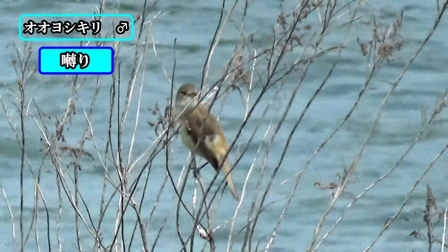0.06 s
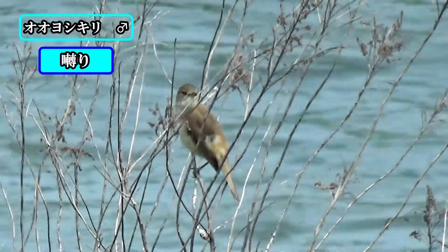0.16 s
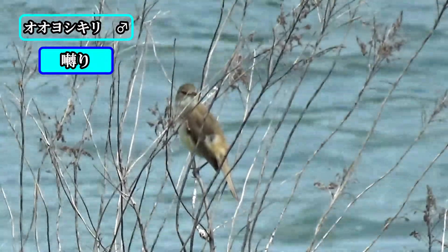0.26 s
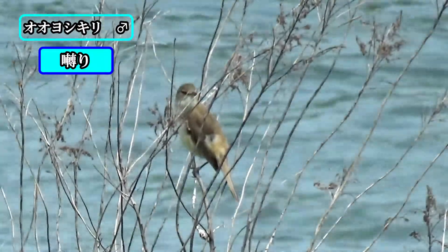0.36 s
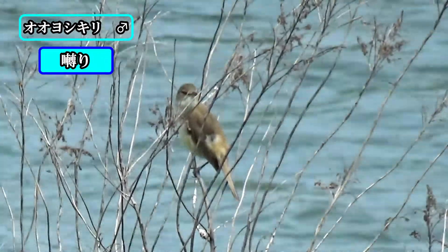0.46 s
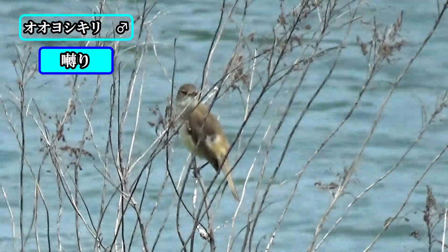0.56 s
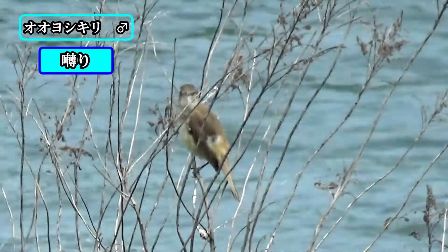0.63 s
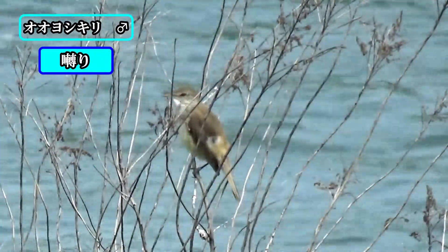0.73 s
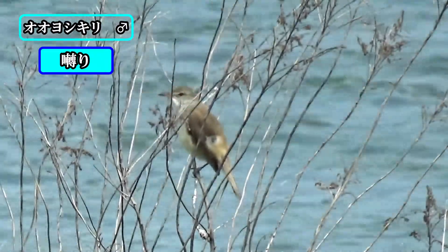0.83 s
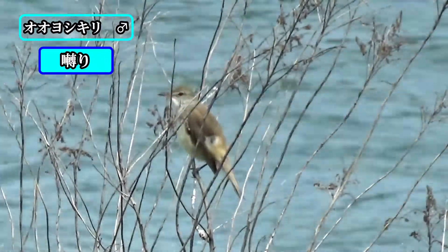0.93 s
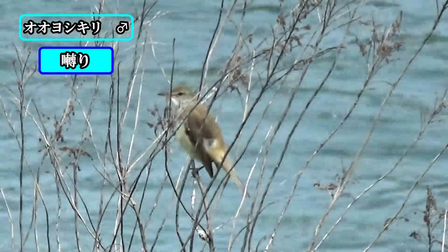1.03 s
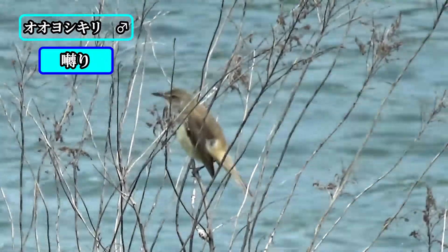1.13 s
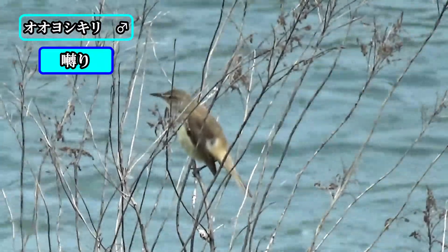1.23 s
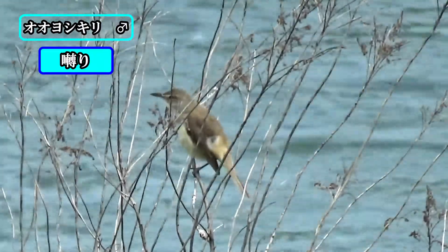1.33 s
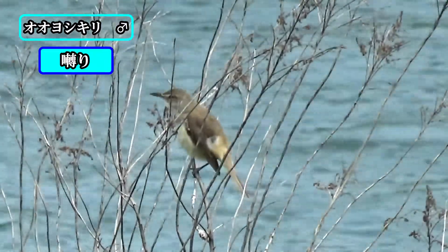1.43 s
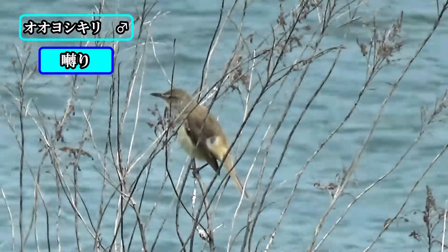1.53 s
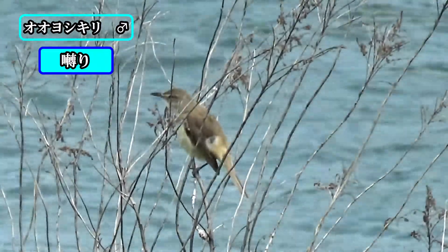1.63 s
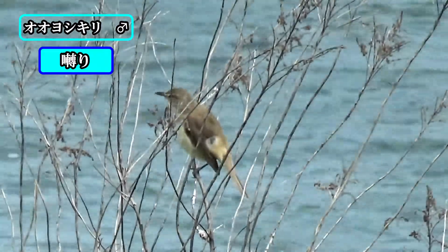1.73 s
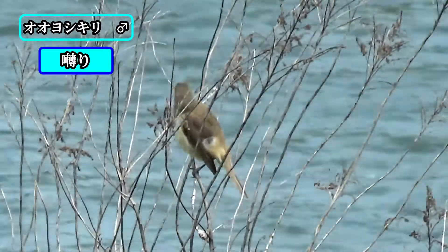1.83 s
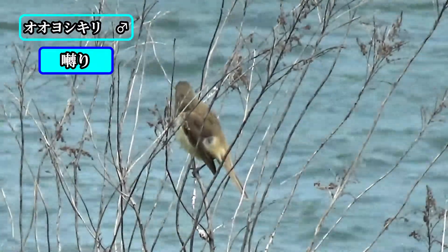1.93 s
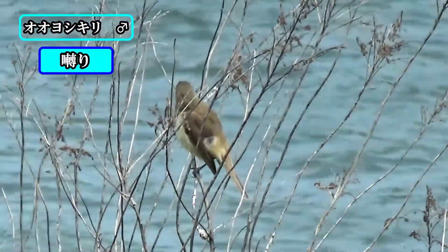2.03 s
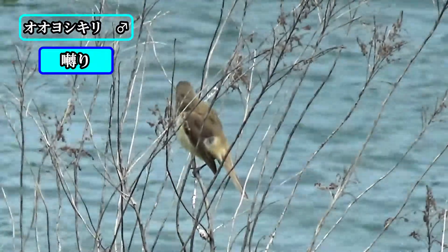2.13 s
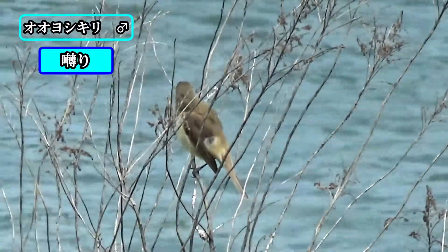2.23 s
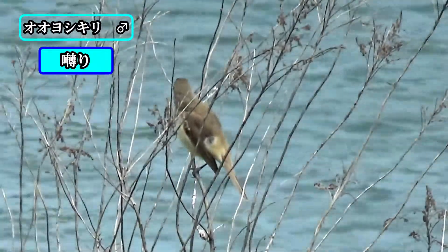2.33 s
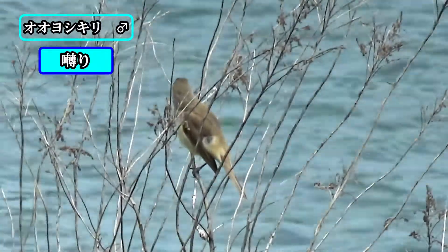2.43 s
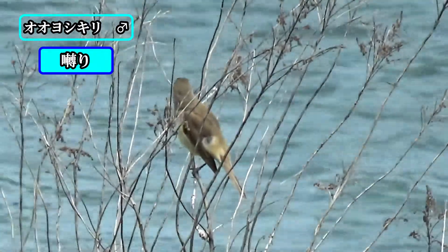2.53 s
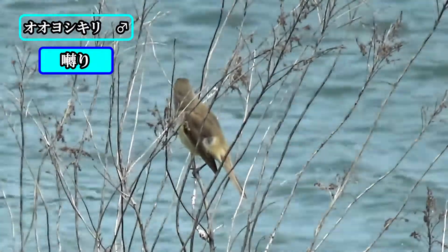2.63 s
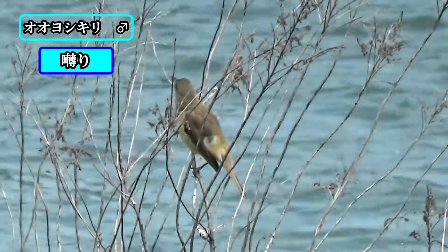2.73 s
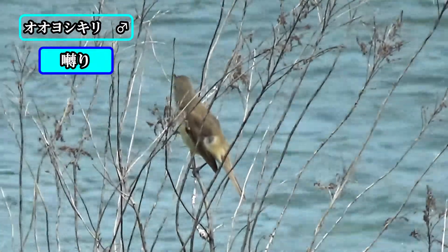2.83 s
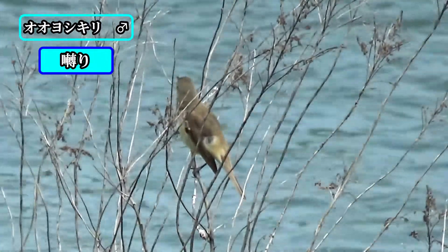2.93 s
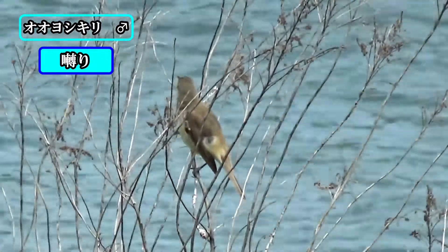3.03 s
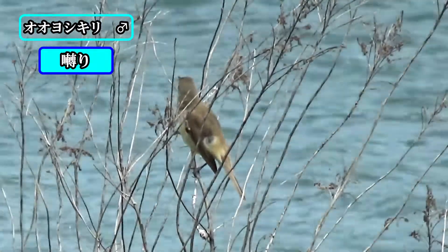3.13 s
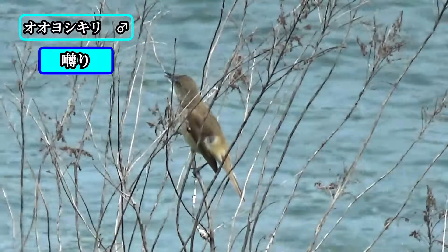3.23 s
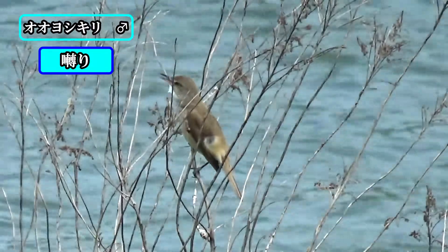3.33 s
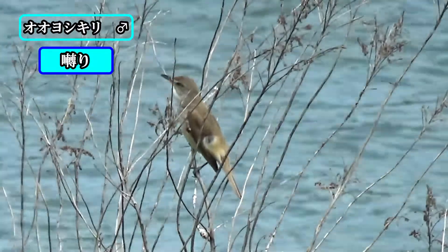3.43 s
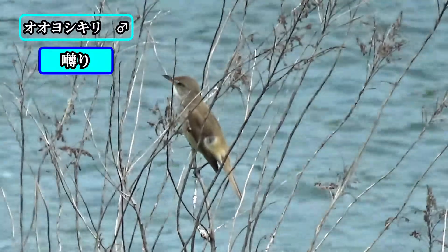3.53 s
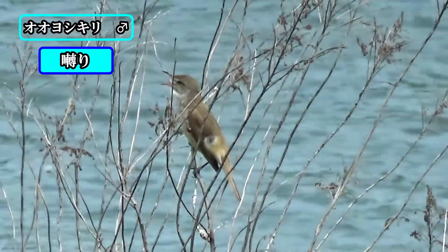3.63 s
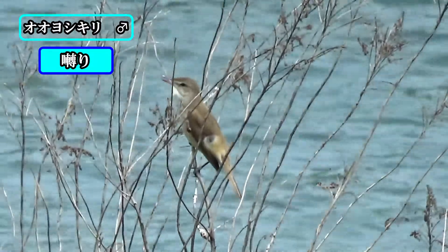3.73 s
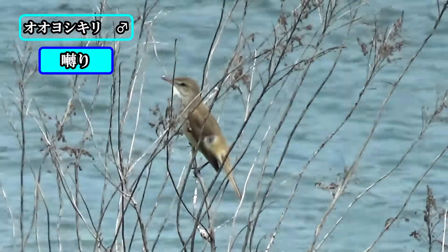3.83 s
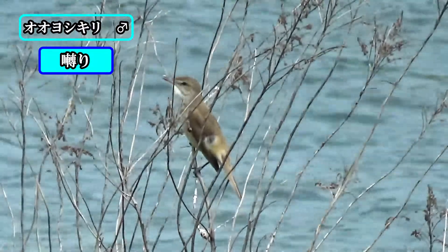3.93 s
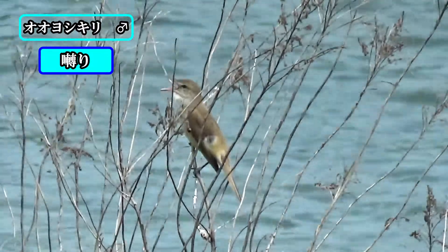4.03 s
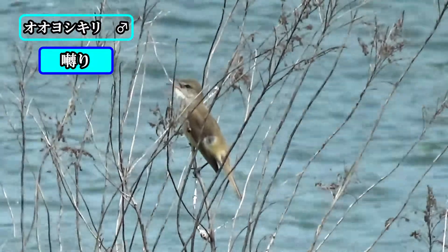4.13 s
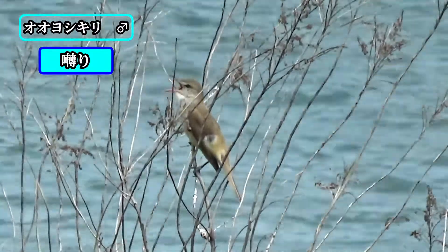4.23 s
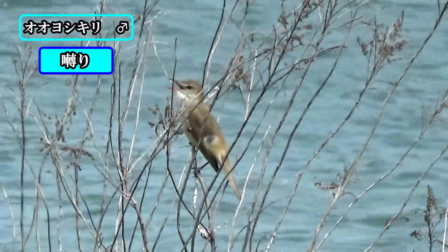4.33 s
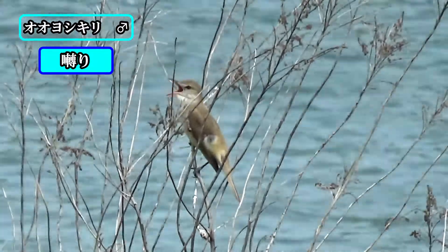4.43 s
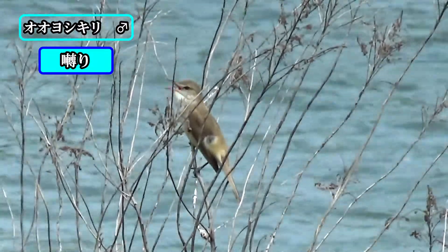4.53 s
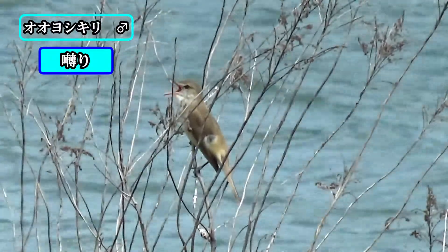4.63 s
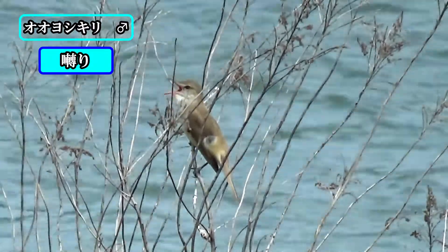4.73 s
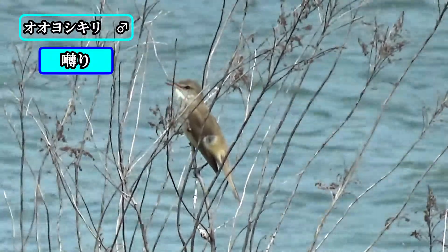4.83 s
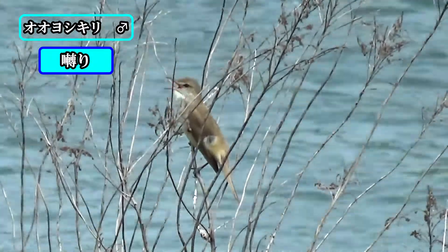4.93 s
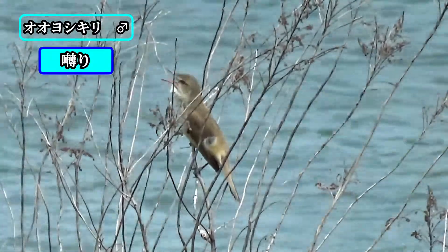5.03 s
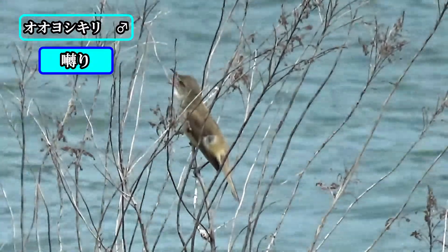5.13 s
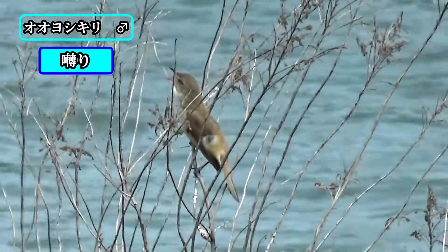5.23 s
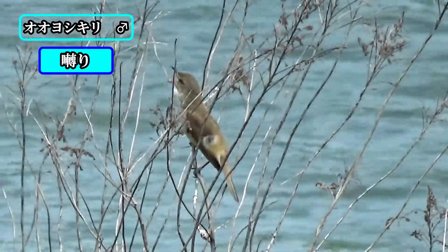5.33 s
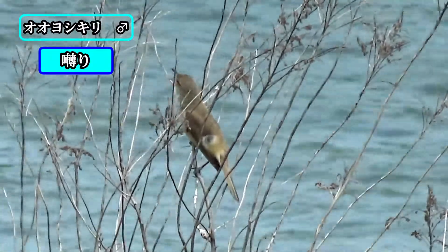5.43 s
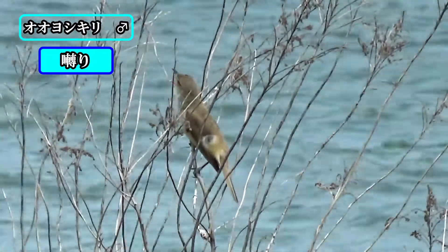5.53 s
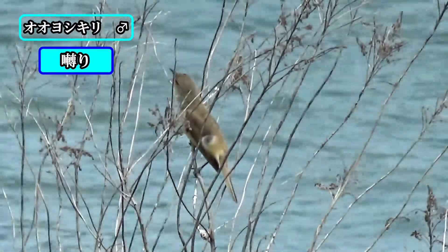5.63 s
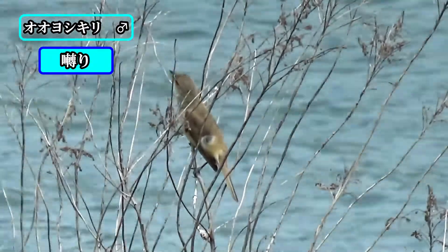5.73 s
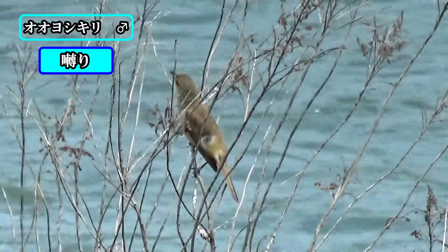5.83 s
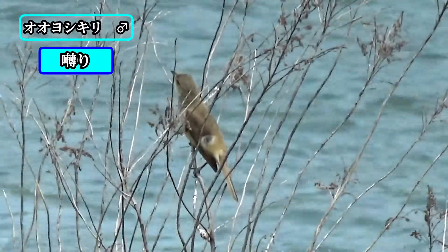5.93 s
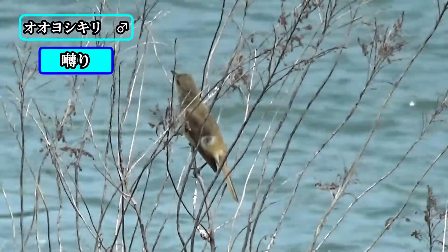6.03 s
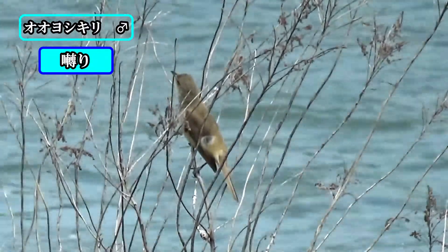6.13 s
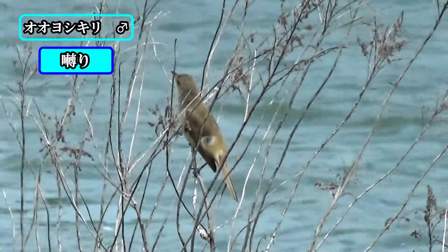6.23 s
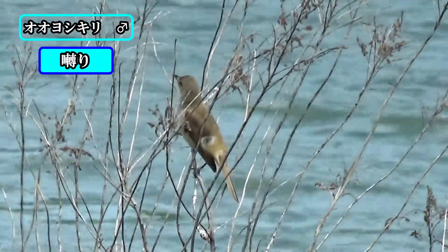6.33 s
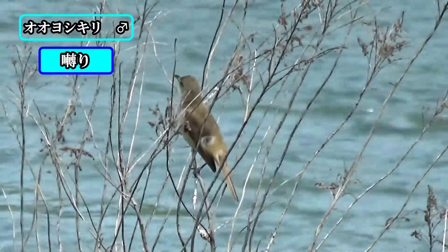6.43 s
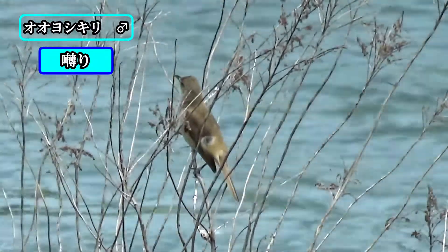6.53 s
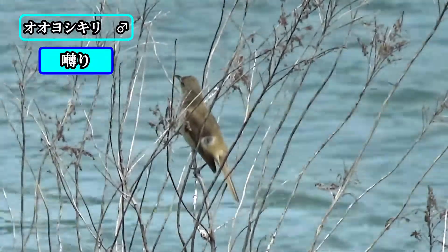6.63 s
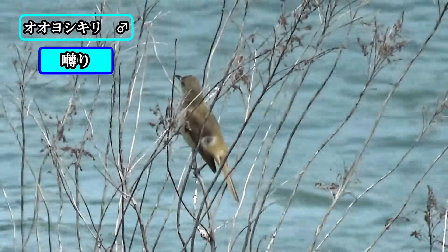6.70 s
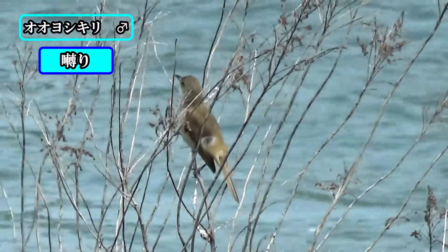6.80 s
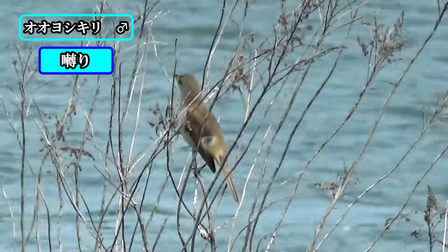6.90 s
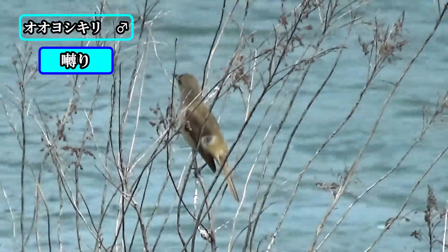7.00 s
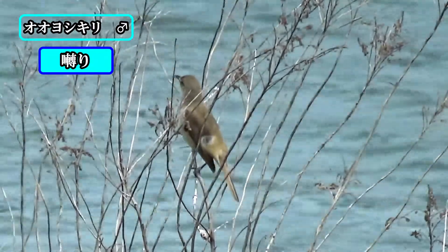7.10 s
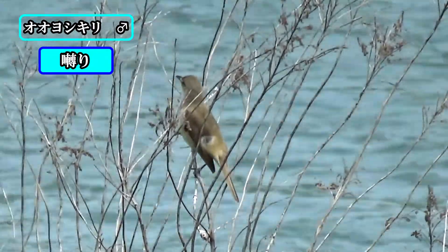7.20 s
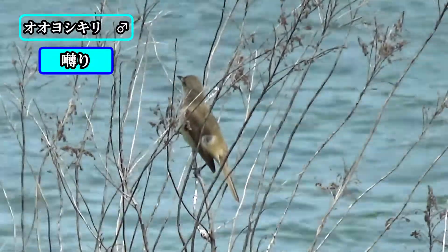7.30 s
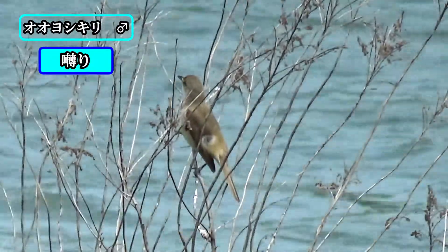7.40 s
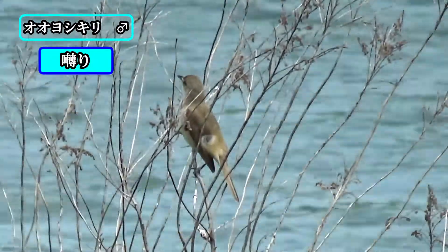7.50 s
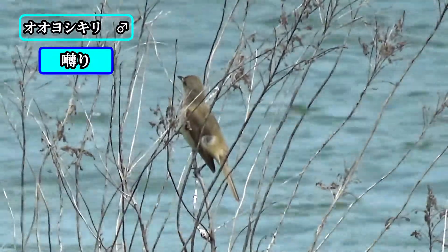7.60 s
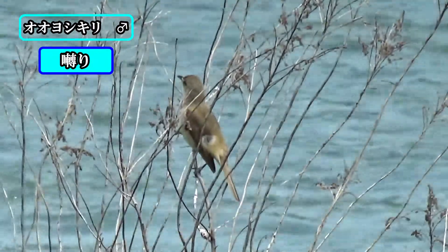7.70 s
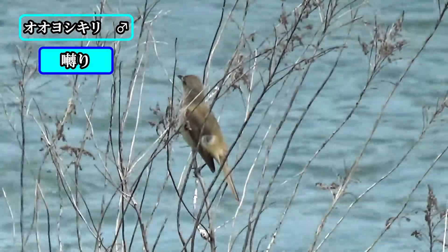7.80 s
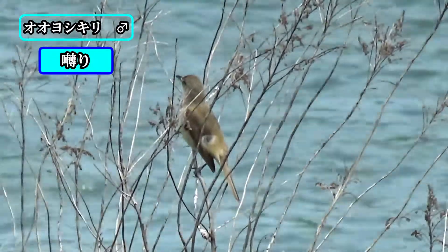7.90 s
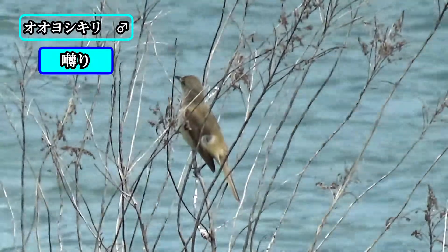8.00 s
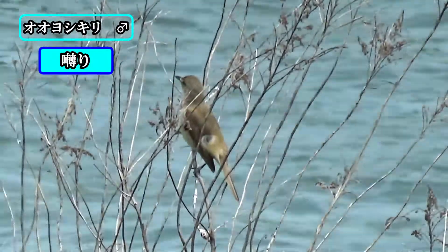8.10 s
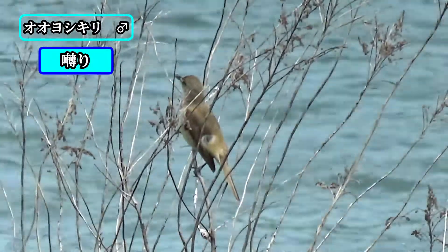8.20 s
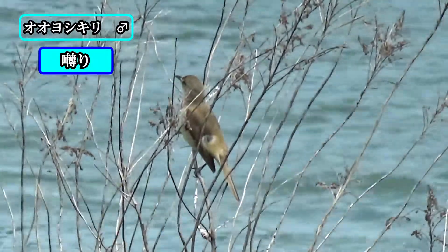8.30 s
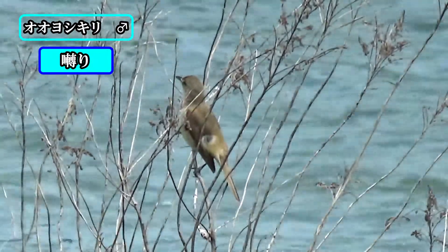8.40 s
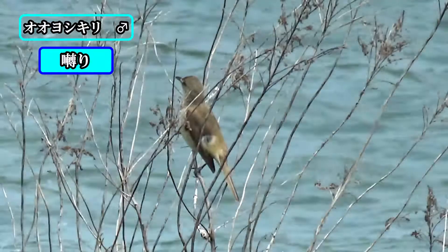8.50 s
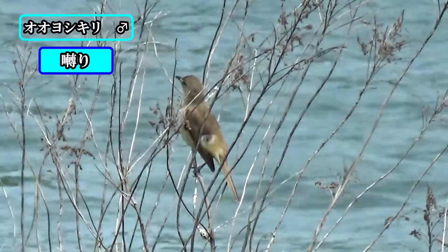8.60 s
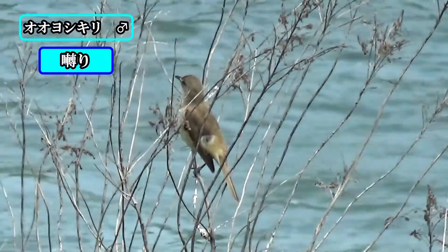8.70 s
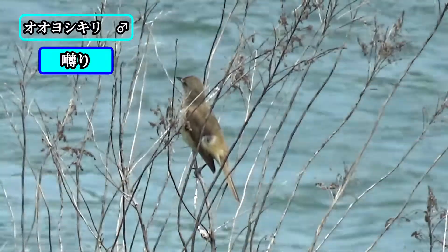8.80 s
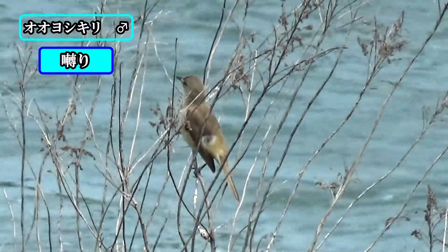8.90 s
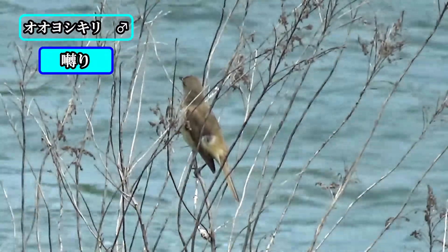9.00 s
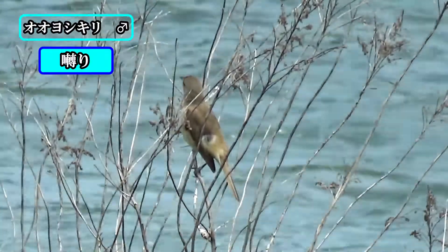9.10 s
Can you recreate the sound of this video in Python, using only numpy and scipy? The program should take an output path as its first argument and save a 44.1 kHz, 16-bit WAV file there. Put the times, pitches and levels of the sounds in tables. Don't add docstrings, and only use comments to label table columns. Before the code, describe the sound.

A reed warbler sings short buzzy chirrs, tick-and-whistle notes and harsh rasps over steady wind hiss in dry reeds, with faint far birds whistling.

```python
import sys
import numpy as np
from scipy import signal
from scipy.fft import rfft, irfft, next_fast_len
from scipy.io import wavfile
from scipy.ndimage import uniform_filter1d

SR = 44100
rng = np.random.default_rng(int(sys.argv[2]) if len(sys.argv) > 2 else 0)


def volts_from_db(level):
    exponent = np.asarray(level, float) / 20
    return 10 ** exponent


def digitize_waveform(pressure):
    field = np.atleast_2d(pressure).T
    bounded = np.clip(field, -1, 1)
    quanta = np.round(bounded * 32767).astype(np.int16)
    wavfile.write(sys.argv[1], SR, quanta)


N = 403515
T = np.arange(N) / SR
FAST = next_fast_len(N)
HZ = np.fft.rfftfreq(FAST, 1 / SR) + 1


def on_log(points, hz):
    p = np.array(points, float)
    return np.interp(np.log(hz + 1), np.log(p[:, 0]), p[:, 1])


def colour(x, points):
    return irfft(rfft(x, FAST) * volts_from_db(on_log(points, HZ)), FAST)[:N]


def noise(points):
    x = colour(rng.standard_normal(N), points)
    return x / x.std()


def ring(x, modes):
    response = sum(volts_from_db(db) / (1 + 1j * (HZ ** 2 - f ** 2) / (HZ * w)) ** 2 for f, w, db in modes)
    return irfft(rfft(x, FAST) * response, FAST)[:N]


def walk(rate_hz):
    k = int(SR / rate_hz)
    steps = np.repeat(rng.standard_normal(N // k + 1), k)
    return 1.3 * uniform_filter1d(uniform_filter1d(steps, k), k)[:N]


def curve(points):
    return np.interp(T, *np.transpose(points))


def play(tables, edge_ms=2.5):
    gate = np.clip(sum((T >= t[0][0]) & (T < t[-1][0]) for t in tables), 0, 1)
    s, *columns = np.transpose(sorted(row for t in tables for row in t))
    gate = uniform_filter1d(1. * gate, int(edge_ms * SR / 1000) + 1)
    return gate, [np.interp(T, s, c) for c in columns]


def spin(hz):
    return np.exp(2j * np.pi * np.cumsum(hz) / SR)


def pulses(hz, scatter_db):
    cycle = np.floor(np.cumsum(hz * (1 + .08 * walk(900))) / SR)
    return np.diff(cycle, prepend=0) * volts_from_db(scatter_db * rng.standard_normal(N)) * np.sqrt(SR / hz)


def stretch(start_s, length_s, shape):
    share, *columns = np.transpose(shape)
    return start_s + length_s * share, share, columns


REEDS_DB = -53
# [f/Hz, level/dB per Hz]
REEDS = [(150, -52), (250, -20.5), (421, -12), (575, -12.5), (684, -7), (903, -7.5), (1280, -1.5),
         (1630, -1), (2990, -4.5), (4300, -6), (4940, -13.5), (6520, -8.5), (8760, -18), (10600, -20),
         (15800, -26.5)]
# [t/s, level/dB]
GUSTS = [(0, -55), (.5, -54), (.9, -60), (1.3, -52), (1.6, -55.5), (2.5, -57), (3.9, -58.5), (4.3, -50),
         (5, -53), (5.85, -58), (6.05, -54), (6.13, -47.5), (6.25, -47.5), (6.4, -56), (6.6, -61.5),
         (7.5, -66), (8.5, -57.5), (9.15, -59)]
# [f/Hz, level/dB per Hz]
RUSTLE = [(900, -28.5), (1400, -10), (2200, -4.5), (2650, -0.5), (3200, -3.5), (4300, -6.5), (4800, -18),
          (5500, -6.5), (7500, -12.5), (9800, -31.5), (13000, -34)]
# [t/s, level/dB]
INSECTS = [(0, -77), (.3, -70), (1.4, -64.5), (1.7, -76), (5.94, -82), (6.02, -63), (6.2, -58), (6.3, -62),
           (6.38, -72), (9.15, -89)]
# [t/s, level/dB]
BUFFETS = [(0, -79.5), (1.2, -84), (4, -83), (4.7, -80.5), (6.5, -84), (8, -82.5), (9.15, -80)]
# [f/Hz, level/dB per Hz]
RUMBLE = [(15, -30), (25, -2.5), (43, 4.5), (64, -11.5), (97, 3), (135, -11.5), (171, -2.5), (249, -11.5),
          (300, -7.5), (390, -6.5), (660, -120)]


def wind():
    steady = volts_from_db(REEDS_DB - 0.5 + .5 * walk(2.95)) * noise(REEDS)
    gusts = volts_from_db(curve(GUSTS) + walk(25)) * noise(RUSTLE)
    insect_band = noise([(4900, -60), (5280, -4), (5450, 0), (5700, -16), (6300, -60)])
    insects = volts_from_db(curve(INSECTS) + 1.5 * walk(30)) * insect_band
    rumble = volts_from_db(curve(BUFFETS) + 4.0 + 2.0 * walk(5)) * noise(RUMBLE)
    return steady + gusts + insects + rumble


def glide(start_s, length_s, first_hz, last_hz, peak_db):
    s, share, (under_db,) = stretch(start_s, length_s, [(0, -2), (0.58, 0), (1, -1.5)])
    return list(zip(s, first_hz + (last_hz - first_hz) * share, peak_db + under_db))


# [start/s, length/s, first f/Hz, last f/Hz, peak level/dB]
NOTES = [(0.079, 0.066, 1980, 1710, -53.5), (0.124, 0.051, 3120, 3030, -49.5), (.14, .03, 2450, 2450, -54),
         (0.191, .016, 3060, 3050, -51), (0.279, 0.048, 3000, 3120, -47.5), (0.343, 0.015, 3090, 3100, -49),
         (0.451, 0.0097, 2250, 1910, -47.5), (0.634, 0.036, 2700, 2700, -55), (1.462, .04, 3400, 3500, -56),
         (1.395, .05, 4400, 5000, -61), (2.692, 0.013, 3890, 2900, -50), (2.752, 0.013, 3390, 3150, -53),
         (2.786, .014, 4200, 3500, -54), (3.248, .02, 3720, 3100, -54), (8.605, .02, 4000, 5600, -58),
         (2.811, 0.014, 1700, 1505, -50), (3.271, 0.013, 1700, 1540, -50), (5.995, 0.073, 3470, 3520, -53),
         (6.4, 0.036, 4200, 4200, -57.5), (7.3, 0.4, 1826, 1830, -62), (7.72, .035, 4360, 4550, -60),
         (7.8, 0.043, 2740, 2570, -57), (7.88, 0.046, 3700, 3890, -62), (8.161, 0.013, 3150, 2430, -49),
         (8.173, .01, 2150, 1750, -49), (8.178, .015, 1500, 1450, -53), (8.165, 0.023, 3500, 3500, -57),
         (8.428, 0.14, 6250, 6270, -62), (8.88, .014, 4200, 4700, -51)]
# [t/ms, f/Hz, level/dB]
ARCH = [(0, 3320, -12), (20, 3480, -2), (45, 3540, 0), (72, 3380, -2), (80, 3200, -12)]
HOOK = [(0, 3300, -11), (30.1, 3650, -0.5), (60.9, 3800, -2), (76, 4130, -2), (88.8, 3200, -2.5),
        (93.7, 3900, -12), (110, 3350, -6), (122, 3200, -2)]
SPIKE = [(0, 3150, -5.5), (20, 4200, 4), (38.2, 4700, -7), (53, 5080, -11), (63, 4400, -2.5), (71, 3150, 0),
         (79, 2600, -5), (89.6, 1770, 4)]
CARET = [(10.05, 1400, -3), (25, 2030, 0), (38, 2160, 4.5), (52, 1920, -6), (70, 1760, -7)]
VEE = [(0, 2700, -1), (11.1, 3130, 1), (32, 1600, -2), (44.1, 1700, 0), (62.4, 2600, -9), (74, 2850, 0.5),
       (87.5, 2940, -8)]
OVER = [(0, 10500, 5), (40, 10800, 2), (80, 11300, -7), (125, 10800, 0), (165, 10500, -3)]
UNDER = [(0, 10500, -3), (45, 10200, 0), (85, 10450, -2)]
DIVE = [(0, 3750, -4), (15, 3950, -2), (22, 3600, 8), (33.3, 2400, -2.5), (50, 2480, -13), (60, 2300, 0),
        (72.7, 1530, -3)]
RISE = [(0, 2950, -3), (20.1, 4000, 3.5), (42, 4650, -6), (60, 5000, -14)]
# [t/s, level/dB, phrase]
FAR_SONG = [(1.99, -51, ARCH), (7.98, -45, ARCH), (2.26, -47.5, HOOK), (8.25, -43.5, HOOK),
            (2.625, -52, RISE), (2.945, -56.5, RISE), (2.645, -54, RISE[1:3]), (8.615, -44, SPIKE[:6]),
            (8.89, -45.5, SPIKE), (7.72, -46.5, CARET), (7.845, -45.5, VEE), (8.0, -48, DIVE),
            (6.77, -68, OVER), (6.805, -72, UNDER)]


def far_birds():
    out, wobble_hz = np.zeros(N), 45 * walk(300)
    notes = [glide(*row) for row in NOTES]
    for start_s, top_db, phrase in FAR_SONG:
        notes.append([(start_s + ms / 1000, hz, top_db + db) for ms, hz, db in phrase])
    for note in notes:
        s, hz, db = np.transpose(note)
        i = np.arange(int(s[0] * SR), int(s[-1] * SR))
        fade = np.minimum(1, np.minimum(i - i[0], i[-1] - i) / 180)
        tone = spin(np.interp(T[i], s, hz) + wobble_hz[i]).imag
        out[i] += fade * volts_from_db(np.interp(T[i], s, db)) * tone
    out = out + volts_from_db(-9.0) * np.roll(out, int(.005 * SR))
    return 1.33 * out * volts_from_db(2.3 * walk(150))


# [t/s, peak level/dB]
SNAPS = [
    (1.0994, -55),
    (1.442, -29),
    (1.524, -52),
]


def stems():
    hits = np.zeros(N)
    for s, db in SNAPS:
        hits[int(s * SR)] = volts_from_db(db + 24.0)
    return ring(hits, [(9100, 1200, 3.0), (11500, 2100, -12), (14500, 2500, -15)])


# [t/s, pulse f/Hz, level/dB, throat f/Hz]
CHIRRS = [
    [(2.396, 262, -49, 2280), (2.404, 267, -42, 2290), (2.414, 266.4, -39, 2310), (2.428, 277, -34.5, 2320),
     (2.444, 269, -39.5, 2270), (2.451, 264, -48, 2300)],
    [(2.863, 263, -47, 2300), (2.879, 272.7, -34.5, 2350), (2.899, 280, -32, 2420), (2.917, 273, -38, 2410),
     (2.926, 272, -48, 2390)],
    [(3.322, 247, -45, 2195), (3.334, 258, -36, 2300), (3.35, 278.3, -31.5, 2410),
     (3.366, 276.6, -32, 2440), (3.376, 263.4, -40, 2440), (3.380, 262, -47, 2450)],
]
# [multiple of throat f, width/Hz, level/dB]
CHIRR_THROAT = [(1., 420, 7), (1.52, 420, -6), (1.76, 360, -20), (2.05, 400, -26)]


def chirrs():
    gate, curves = play(CHIRRS)
    on, voice = gate > 0, np.zeros(N)
    hz, db, throat_hz = (c[on] for c in curves)
    since_s = np.interp(T, *[[row[0] for rows in CHIRRS for row in rows]] * 2)[on] - CHIRRS[0][0][0]
    hiss_db, upper_db = -32 + 10 * since_s, -5.5 * since_s
    turn = 2 * np.pi * np.cumsum(hz * (1 + 0.0092 * walk(200)[on])) / SR
    tone, power = 0, 0
    for k in range(20):
        gain = 0
        for multiple, width_hz, mode_db in CHIRR_THROAT:
            off = 2 * (k * hz - multiple * throat_hz) / width_hz
            gain = gain + volts_from_db(mode_db + (multiple > 1.2) * upper_db) / (1 + off ** 2) ** 1.5
        tone = tone + gain * np.cos(k * turn + .5 * k * k)
        power = power + gain ** 2 / 2
    air = volts_from_db(-13) * noise([(1900, -30), (2200, 5), (2800, -2), (4300, -10), (4800, -30)])
    hiss = noise([(8000, -17), (9300, -8), (9900, -3), (10500, -11), (11000, -8), (12000, -30)])
    voice[on] = volts_from_db(db) * (tone / np.sqrt(power) + air[on] + volts_from_db(hiss_db) * hiss[on])
    return gate * voice


# [start/s, end/s, level/dB]
BUZZES = [
    (3.678, 3.702, -40),
    (5, 5.03, -32.5),
    (5.191, 5.208, -32.5),
    (5.369, 5.389, -35),
    (5.582, 5.602, -33.5),
]


def buzzes():
    gate, (db,) = play([[(a, d - 10), (a / 2 + b / 2, d - 1.5), (b, d)] for a, b, d in BUZZES])
    source = pulses(370 * (1 + .15 * walk(200)), scatter_db=1.5) + .25 * rng.standard_normal(N)
    buzz = ring(source, [(3350, 980, 4), (4200, 800, -4), (6500, 2000, -25)])
    return gate * volts_from_db(db - 7.5) * buzz / buzz.std()


# [t/s, peak level/dB, ring f/Hz]
CLACKS = [(3.7217, -26, 2900), (3.7245, -24, 3300), (3.7265, -27, 3430), (3.7301, -38, 3180),
          (3.7324, -22, 2750), (3.7341, -23, 2600), (3.7366, -26, 2460), (3.7397, -24, 2470),
          (3.7416, -30, 2500), (3.7438, -26, 2170), (3.7461, -32, 2103), (5.0221, -24, 3520),
          (5.0242, -23, 3740.0), (5.0268, -32.5, 3660.0), (5.2145, -22, 3400), (5.2166, -20, 3450),
          (5.2186, -26, 3280.0), (5.392, -25.1, 3490), (5.3957, -19, 3156), (5.3976, -26, 3165),
          (5.6076, -23.5, 3310), (5.6093, -24, 3550), (5.6114, -25.4, 3650.0)]
# [t/s, peak level/dB, ring f/Hz]
BODIES = [(5.0424, -21.8, 3200), (5.0444, -18, 3140.0), (5.0464, -19, 3190), (5.0478, -22.9, 3130),
          (5.0505, -16.4, 3130.0), (5.0529, -17, 3220), (5.0563, -18, 3170), (5.059, -18.6, 3270),
          (5.0611, -18, 2970), (5.063, -19, 2930.0), (5.067, -18, 3160.0), (5.0704, -19.3, 2980),
          (5.0733, -18, 3280), (5.0758, -29, 3050.0), (5.2329, -18.8, 3140.0), (5.236, -17.5, 3315),
          (5.2406, -18, 3230.0), (5.2435, -24, 3230), (5.2466, -20.4, 3195), (5.2479, -20.0, 3150),
          (5.2512, -18, 3080), (5.254, -20, 3070.0), (5.2571, -22, 3095), (5.2592, -19.5, 3100.0),
          (5.2628, -19, 3090), (5.2654, -21.5, 2750), (5.2683, -35, 2980.0), (5.4119, -21.3, 3390),
          (5.4139, -22, 3270), (5.4162, -17, 3370.0), (5.4188, -23, 2810), (5.4212, -18.9, 3275),
          (5.4239, -20, 3210), (5.428, -20, 3360.0), (5.4302, -23.2, 3000), (5.4332, -19, 2900),
          (5.4356, -19.9, 3160), (5.437, -19.1, 3260), (5.4409, -16.5, 2990.0), (5.4434, -21, 3190),
          (5.4453, -20, 3116), (5.448, -28, 3220), (5.4505, -33, 2950), (5.6262, -22, 3270),
          (5.63, -17.5, 3190), (5.6349, -15.8, 3270), (5.637, -22, 3280.0), (5.6413, -21, 3270),
          (5.6453, -16, 3064), (5.6487, -22, 3260.0), (5.6506, -24, 3420), (5.6533, -17.5, 3000.0),
          (5.6576, -20, 3230), (5.6601, -20.7, 3040), (5.6635, -29.7, 3020.0), (5.6664, -28.4, 3230)]
# [t/s, peak level/dB, ring f/Hz]
STUTTERS = [(5.087, -25, 3020), (5.089, -35, 3140), (5.0985, -28, 3230), (5.1, -32, 3040),
            (5.1055, -26, 3130), (5.1085, -35.0, 2900), (5.1118, -24.3, 3180), (5.114, -24.5, 3170),
            (5.1165, -33.2, 3100), (5.1196, -28, 2770), (5.1227, -31.4, 2980), (5.1258, -28, 3130),
            (5.1277, -26.5, 2790), (5.1307, -36, 2670), (5.274, -38, 2850), (5.2777, -36, 3000),
            (5.2791, -39, 2914), (5.284, -25.5, 3250), (5.289, -32, 3140), (5.292, -28, 3270),
            (5.2938, -33.8, 3180), (5.2984, -27, 3020), (5.3007, -26, 3060), (5.3086, -29, 3000),
            (5.3103, -28, 2780), (5.318, -27.2, 2920), (5.4569, -25, 3250), (5.4646, -27, 3220),
            (5.471, -26, 3270), (5.4775, -26.5, 3170), (5.4816, -30.7, 3350), (5.4871, -23, 3270),
            (5.4937, -25, 3290), (5.4966, -30, 3120), (5.4986, -35, 3160), (5.6727, -31, 3100),
            (5.675, -34, 3276), (5.6839, -26.5, 3290), (5.6873, -33.0, 3080), (5.69, -32, 3180),
            (5.6921, -29, 3020), (5.6995, -26, 3250), (5.7015, -32, 3000), (5.7035, -33.1, 3080),
            (5.7083, -27, 3200), (5.711, -29, 2970), (5.7146, -33, 3120), (5.7174, -28.7, 3270),
            (5.7198, -35, 3120)]
# [t/s, level/dB]
BEAK_HISS = [
    (3.722, -30),
    (5.0214, -27.5),
    (5.214, -35),
    (5.392, -40),
    (5.6063, -42),
]
# [f/Hz, level/dB per Hz]
RASP_AIR = [(1100, -57), (1650, -2.5), (1950, -17), (2450, -3.5), (3200, 3.5), (4400, -1.5), (5000, -16.5),
            (6500, -11.5), (8300, -32), (9800, -46)]


def rasps():
    s, db, hz = np.transpose(sorted(map(tuple, [*CLACKS, *BODIES, *STUTTERS])))
    gap_s = np.diff(s, prepend=0)
    before = np.sqrt(np.clip(gap_s / 0.0029, .3, 1.7))
    after = np.sqrt(np.clip(np.diff(s, append=99) / 0.0029, .3, 1.7))
    rise_s, fall_s = 0.001 * before, 0.0015 * after
    way = np.cumsum(gap_s > .0027) % 2
    swing = np.zeros((2, N))
    for k in range(len(s)):
        i = int(s[k] * SR) + np.arange(-300, 300)
        t = T[i] - s[k]
        shape = volts_from_db(db[k]) * np.exp(-abs(t / np.where(t > 0, fall_s[k], rise_s[k])) ** 2.6)
        swing[way[k], i] = np.maximum(swing[way[k], i], shape)
    puff, ring_hz = swing.max(axis=0), np.interp(T, s, hz)

    turn = spin(ring_hz + 70 * walk(1200))
    weak = np.interp(T, s, db) < -23
    low = volts_from_db(-15.5 + 2.0 * walk(150) + 6.4 * weak) * spin(.79 * ring_hz + 120 * walk(500))
    octave = volts_from_db(-25) * turn ** 2
    tone = ((swing[0] - swing[1]) * (turn + low) + puff * octave).real

    beak = np.array(BEAK_HISS)
    opens_s, hiss_db = beak[np.maximum(np.searchsorted(beak[:, 0], T + .005) - 1, 0)].T
    closing_db = 8 * np.clip(T - opens_s, 0, .2)
    beak_noise = noise([(10000, -11), (11200, -5), (12500, 0), (13800, -6), (15200, -20)])
    mouth_noise = noise([(4800, -16), (6300, -1), (8600, 0.5), (9800, -12), (11000, -30)])
    hiss = volts_from_db(hiss_db - closing_db) * beak_noise + volts_from_db(-28) * mouth_noise
    return volts_from_db(-1.5) * tone + puff * (volts_from_db(-13.0) * noise(RASP_AIR) + hiss)


# [t/s, peak level/dB]
TICKS = [
    (4.0792, -21),
    (4.2772, -15.5),
    (4.4813, -16.5),
    (4.7067, -15.5),
]
# [t from onset/ms, pulse f/Hz, level/dB]
TICK = [(-15.5, 300, -30), (-2, 360, -9.5), (0, 1400, -3), (3, 1100, -1), (7, 1100, -5), (11, 760, -20),
        (19.5, 650, -20.5), (32.5, 790, -20), (40, 890, -38)]
# [f/Hz, width/Hz, level/dB]
TICK_THROAT = [(3370, 810, -14), (4110, 1600, 5.5), (5000, 940, -3.5), (6250, 340, -0.5),
               (9150, 1500, -4.5), (12500, 2200, -18), (15300, 900, -29)]


def ticks():
    tables = [[(s + ms / 1000, f, d + top_db) for ms, f, d in TICK] for s, top_db in TICKS]
    gate, (hz, db) = play(tables, edge_ms=1.2)
    crack = ring(pulses(hz, scatter_db=2.0) + 0.19 * rng.standard_normal(N), TICK_THROAT)
    return gate * volts_from_db(db - 7.0) * crack / crack[gate > .5].std()


# [share of length, lower side/partings, lower level/dB, upper side/partings, upper level/dB]
PARTING = [(0, -.1, -16, .15, -19), (.25, -0.099, -4, 0.149, -8), (.52, -0.523, -2, 0.486, -5),
           (.88, -.15, 0, .3, -2), (1, -.2, -1, .25, 2)]


def parted(start_s, length_s, hz, apart_hz, db):
    s, _, (low, low_db, high, high_db) = stretch(start_s, length_s, PARTING)
    narrow_db = 20 * np.log10(min(apart_hz / 400, 1))
    return list(zip(s, hz + apart_hz * low, db + low_db, hz + apart_hz * high, db + high_db + narrow_db))


# [start/s, length/s, middle f/Hz, widest parting/Hz, level/dB]
SPLIT = [
    (4.103, 0.033, 4590, 70, -35.5),
    (4.309, 0.0227, 4750, 368.4, -32),
    (4.501, .04, 4760, 482.6, -29),
    (4.733, .029, 4770, 450, -30),
]
# [t/s, f/Hz, level/dB, flutter depth/0-1]
LEAD = [
    [(4.134, 4640, -33, .05), (4.15, 4680, -27.5, .06), (4.162, 4646, -28, .3), (4.17, 4690, -28, 0.26),
     (4.178, 4650, -40, .3), (4.186, 4660, -38, .2)],
    [(4.333, 4730, -32, .2), (4.343, 4810, -24.5, 0.4), (4.359, 4850, -25.5, 0.4), (4.369, 4770, -30, .2),
     (4.372, 4770, -35, .1), (4.379, 4780, -42, .1)],
    [(4.54, 4926, -29, .15), (4.548, 4890, -26, 0.2), (4.572, 4940, -26, 0.2), (4.574, 4930, -30, .15),
     (4.579, 4900, -39, .2), (4.582, 4830, -34, .2), (4.585, 4860, -44, .2)],
    [(4.762, 4920, -30, .15), (4.772, 4840, -30, .15), (4.777, 4715, -28.5, .1), (4.794, 4764, -25, .15),
     (4.808, 4630, -30, .15), (4.812, 4620, -30, .1), (4.818, 4600, -41, .1)],
]
SLIPS = [4.124, 4.128, 4.3453, 4.3528, 4.3607, 4.5396, 4.555, 4.7741]


def whistles():
    gate, (hz, db, depth) = play(LEAD, edge_ms=1.0)
    flutter = np.clip(depth * (1 + 0.3 * walk(80)), 0, 1) * spin(148 * (1 + 0.198 * walk(60)))
    dips_hz = 260 * (flutter.imag + 0.51 * (flutter ** 2).real)
    level = volts_from_db(db + 0.49 * walk(300)) * (1 + 0.6 * flutter.real)
    locked = gate * level * spin(hz + dips_hz + 35 * walk(500))

    gate, (low_hz, low_db, high_hz, high_db) = play([parted(*row) for row in SPLIT], edge_ms=1.2)
    lower = volts_from_db(low_db) * spin(low_hz + 80 * walk(500))
    upper = volts_from_db(high_db) * spin(high_hz + 90 * walk(500))
    z = np.sqrt(2) * (locked + gate * (lower + upper))

    breath = volts_from_db(-19) * noise([(30, -5), (500, 1), (1500, -14), (3000, -25)])
    z = z * (1 + breath)
    for s in SLIPS:
        z = z * np.clip((T - s) / 0.00063, -1, 1)
    z = 1.17 * z / np.sqrt(1 + abs(z / volts_from_db(-20)) ** 2)
    bend = z / np.sqrt(abs(z) + 1e-4)
    second = volts_from_db(1) * z * bend * volts_from_db(2.5 * walk(500))
    third = volts_from_db(-1 + 4.0 * walk(400)) * z * bend ** 2
    return (z - second + third).real


def scene():
    far = far_birds()
    near = stems() + chirrs() + buzzes() + rasps() + ticks() + whistles()
    near = colour(near, [(500, -50), (1200, 0.5)])
    t = T[:SR // 3]
    tails = signal.lfilter([.64], [1, -.41], rng.standard_normal((2, len(t))))
    tails = tails * volts_from_db(-60 * t / 0.22) * (t > .004)
    back, aside = (signal.oaconvolve(near + volts_from_db(5.5) * far, tail)[:N] for tail in tails)
    mid = near + far + volts_from_db(-42.5) * back + wind()
    side = volts_from_db(-28.5) * np.gradient(near) + volts_from_db(-76.5) * aside
    side = side + volts_from_db(REEDS_DB - 30.5) * noise(REEDS) + volts_from_db(-113) * noise(RUMBLE)
    return np.array([mid + side, mid - side])


# [f/Hz, left minus right/dB]
BALANCE_DB = [(100, .1), (200, .3), (380, 1.), (700, 1.1), (2400, .15)]


def capsules(dry):
    return [colour(x, [(hz, sign * db / 2) for hz, db in BALANCE_DB]) for x, sign in zip(dry, (1, -1))]


def low_pass(x):
    return signal.sosfilt(signal.butter(12, 16120, fs=SR, output="sos"), x)


def record(dry):
    top_cut = signal.ellip(10, .1, 80, 15850, fs=SR, output="sos")
    return low_pass(signal.sosfilt(top_cut, capsules(dry)))


dry = scene()
out = record(dry)
digitize_waveform(out)
```